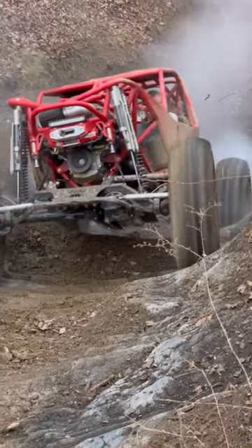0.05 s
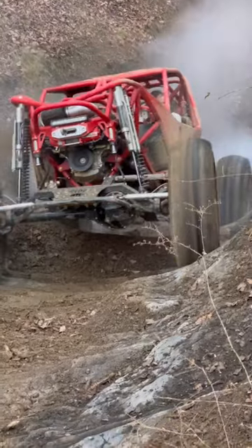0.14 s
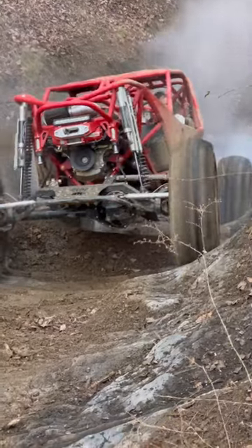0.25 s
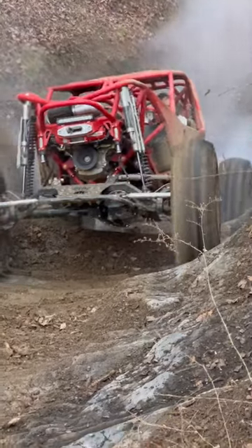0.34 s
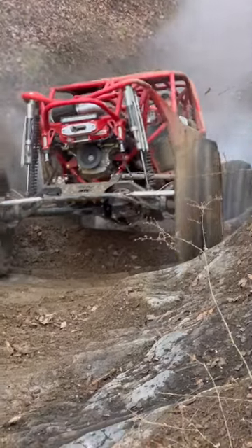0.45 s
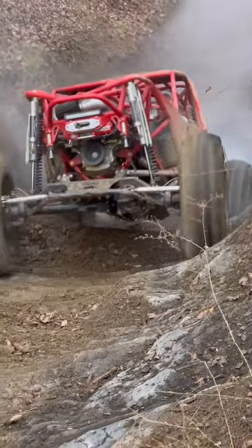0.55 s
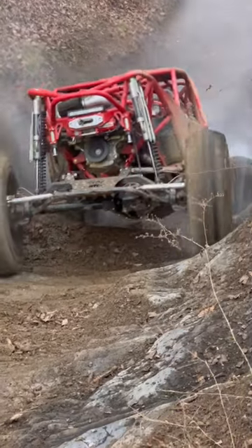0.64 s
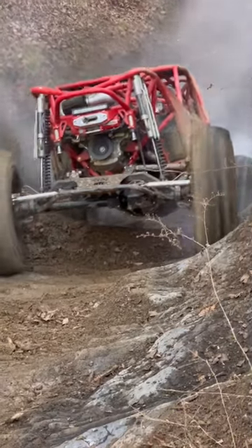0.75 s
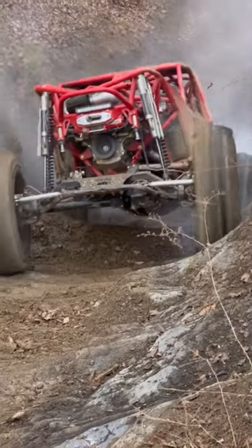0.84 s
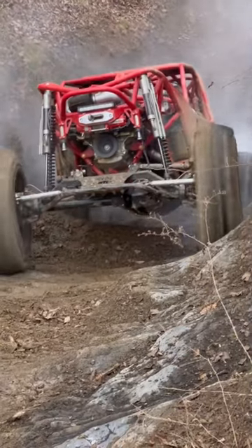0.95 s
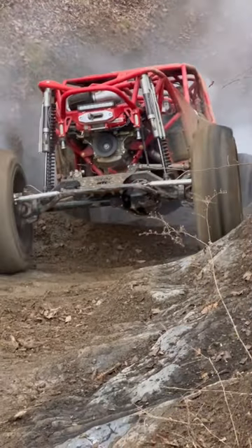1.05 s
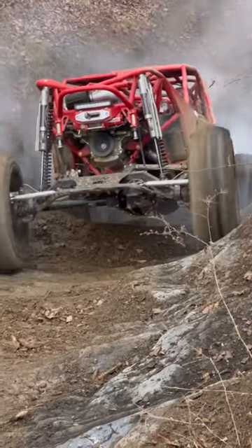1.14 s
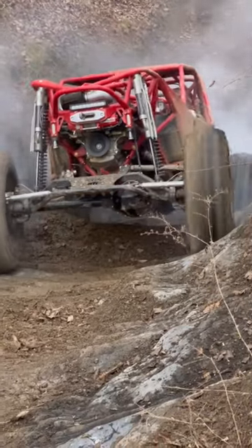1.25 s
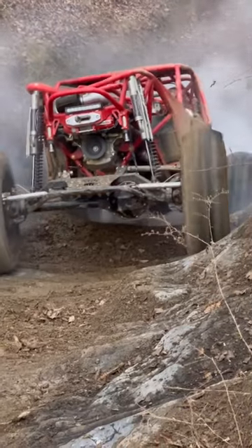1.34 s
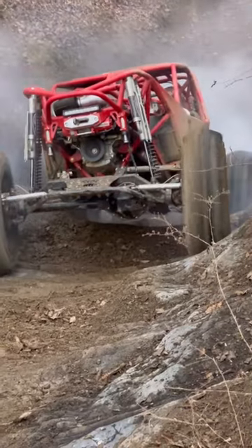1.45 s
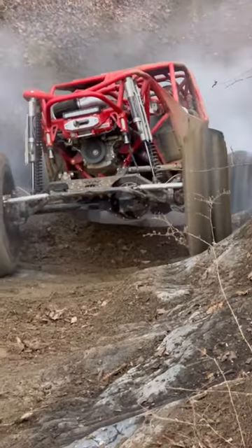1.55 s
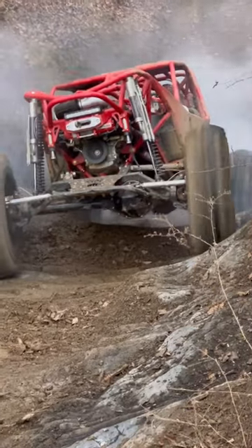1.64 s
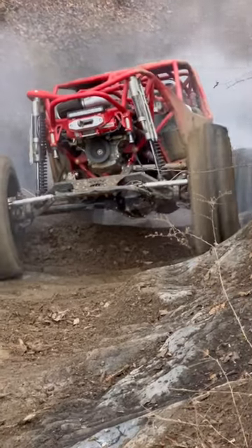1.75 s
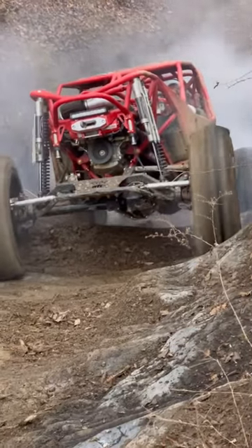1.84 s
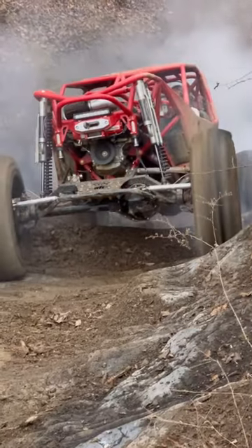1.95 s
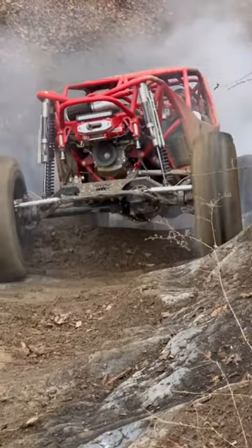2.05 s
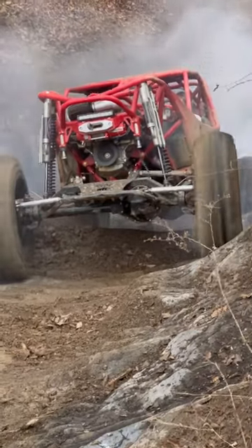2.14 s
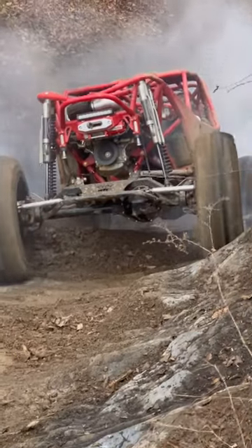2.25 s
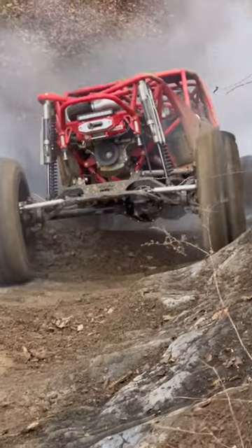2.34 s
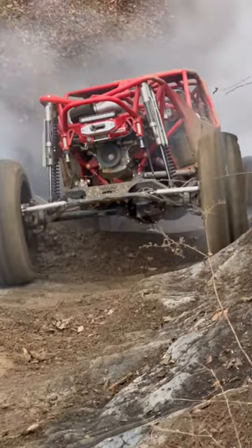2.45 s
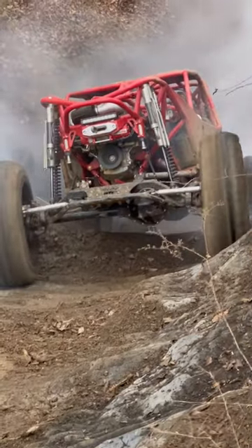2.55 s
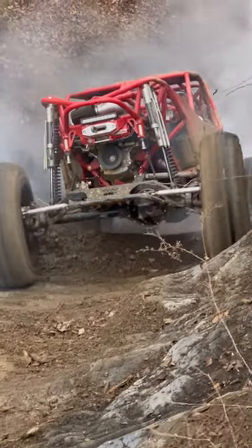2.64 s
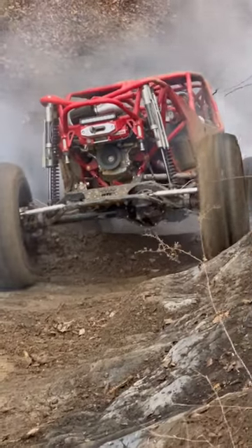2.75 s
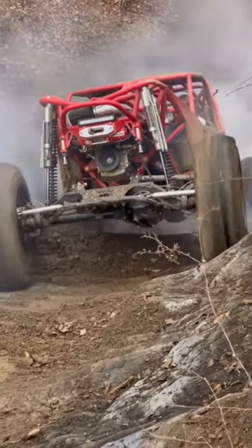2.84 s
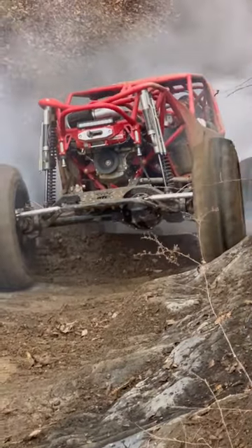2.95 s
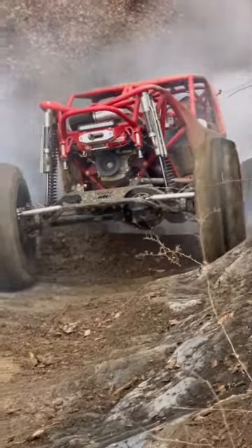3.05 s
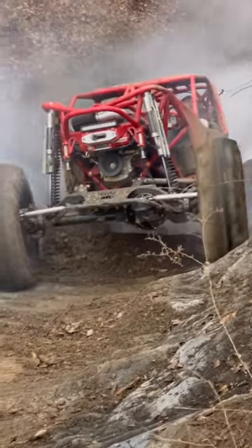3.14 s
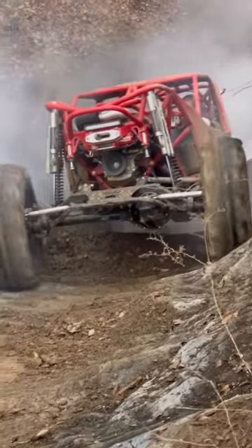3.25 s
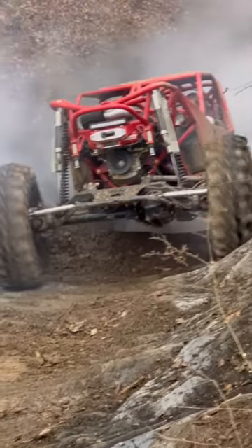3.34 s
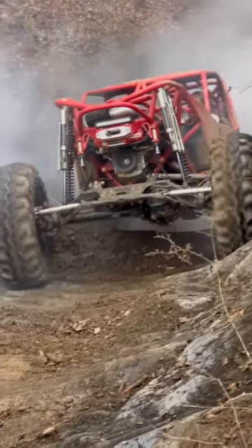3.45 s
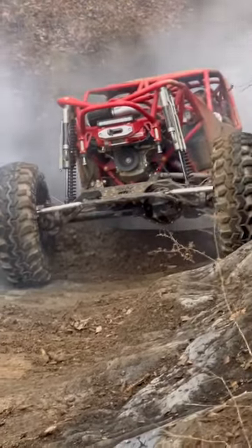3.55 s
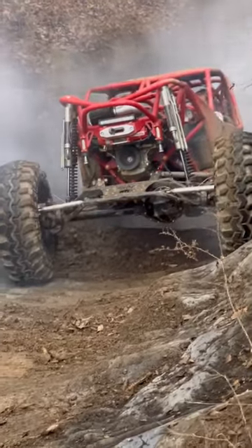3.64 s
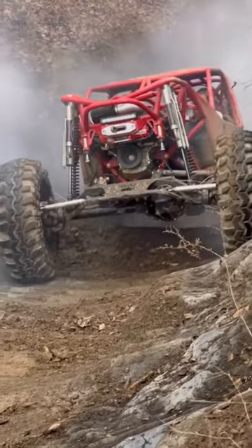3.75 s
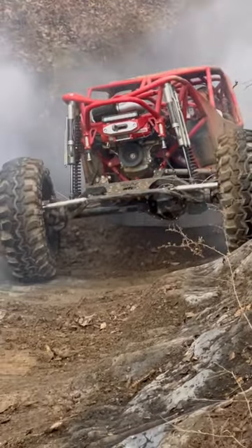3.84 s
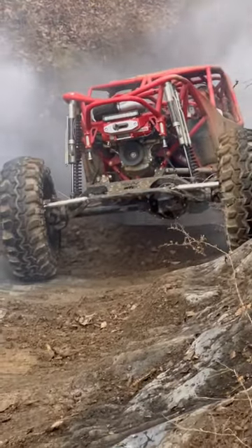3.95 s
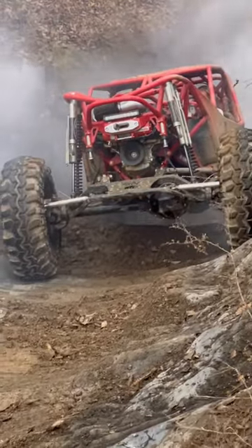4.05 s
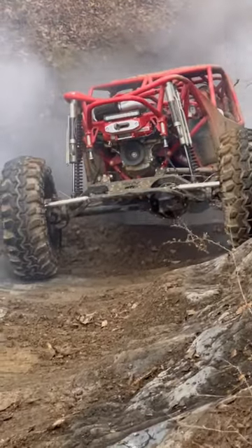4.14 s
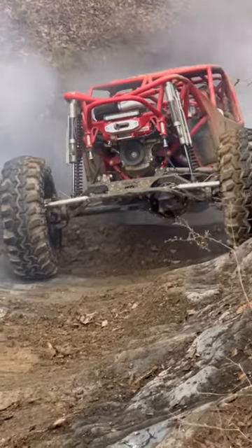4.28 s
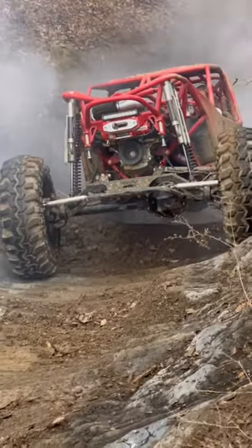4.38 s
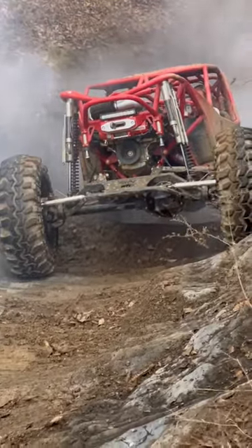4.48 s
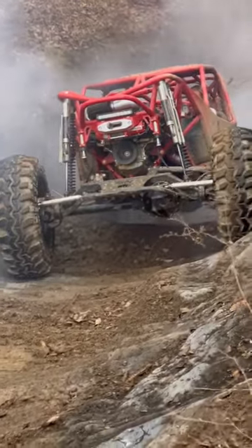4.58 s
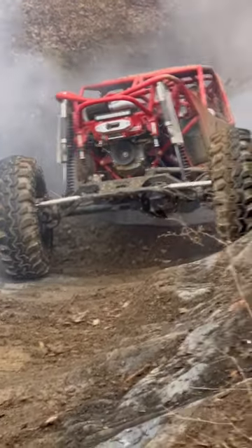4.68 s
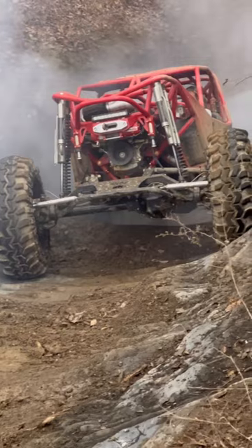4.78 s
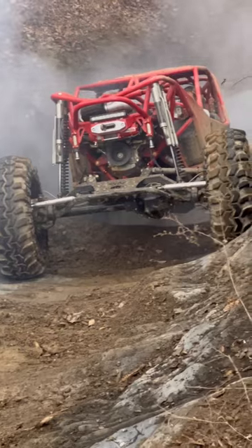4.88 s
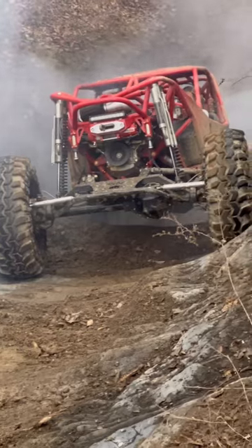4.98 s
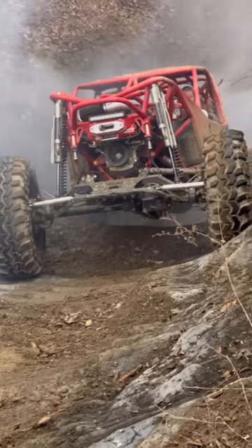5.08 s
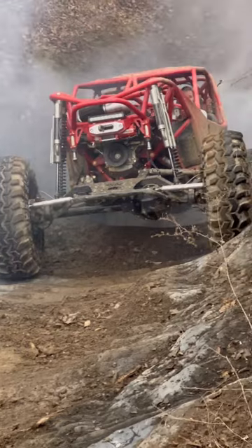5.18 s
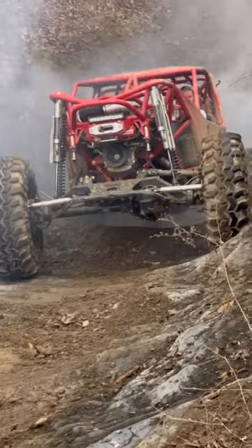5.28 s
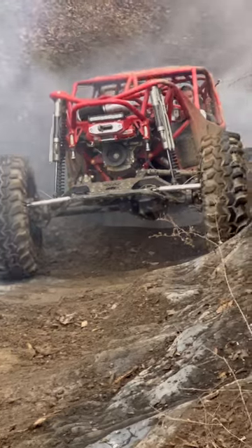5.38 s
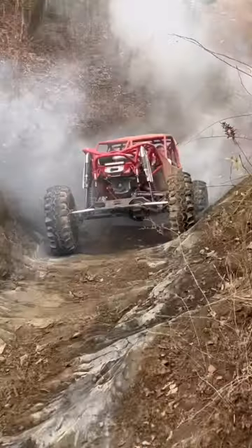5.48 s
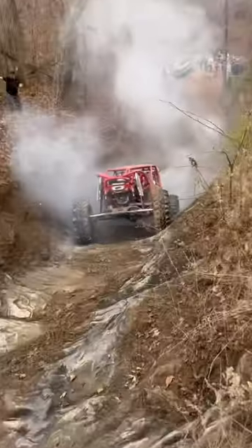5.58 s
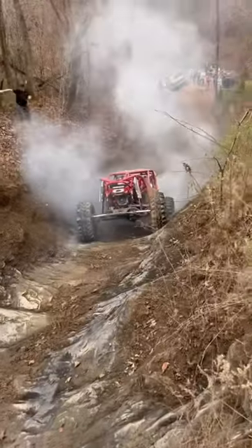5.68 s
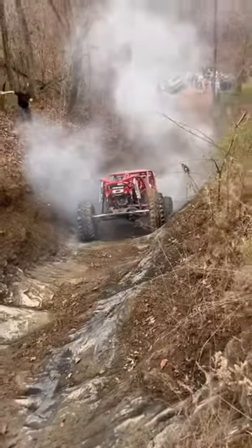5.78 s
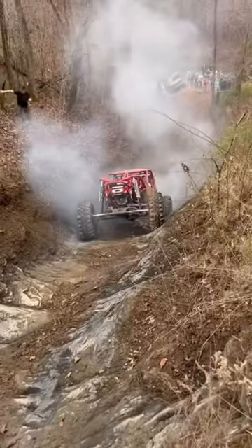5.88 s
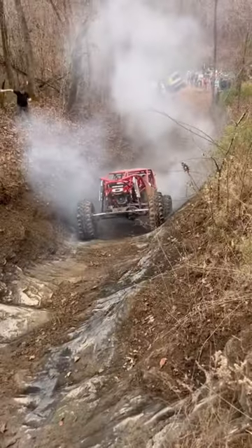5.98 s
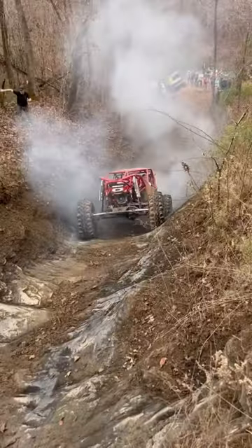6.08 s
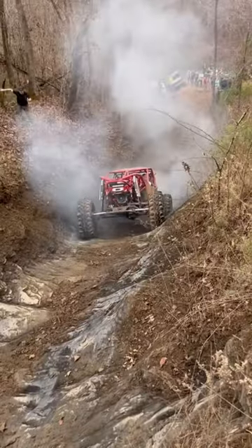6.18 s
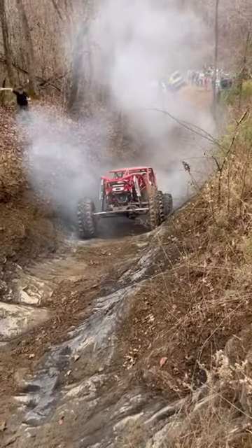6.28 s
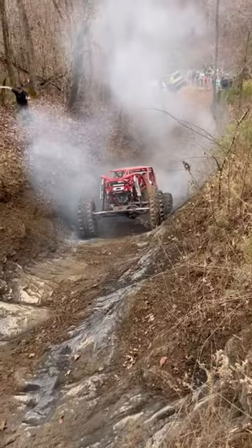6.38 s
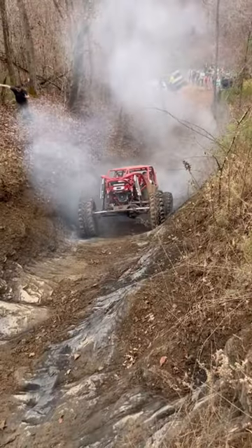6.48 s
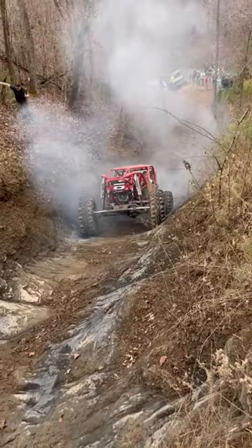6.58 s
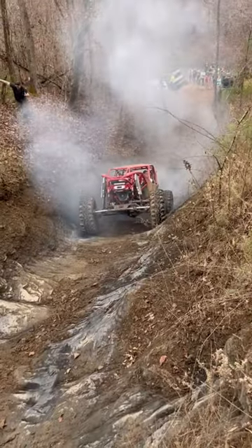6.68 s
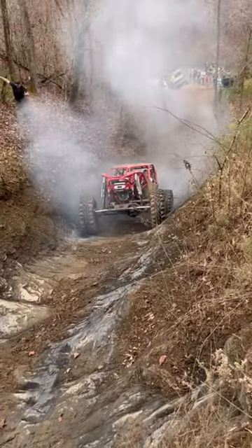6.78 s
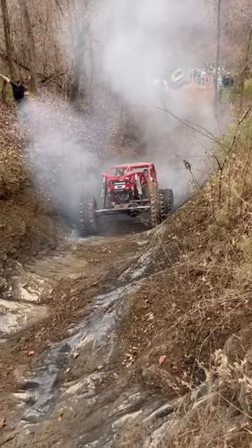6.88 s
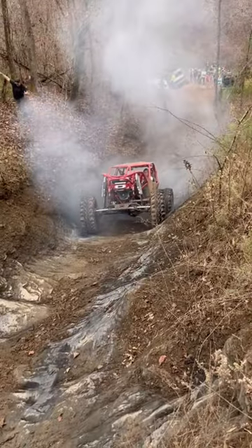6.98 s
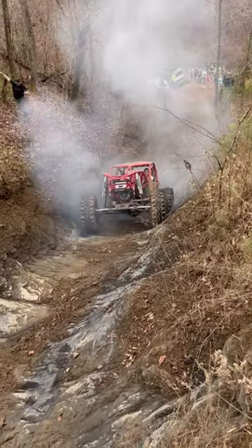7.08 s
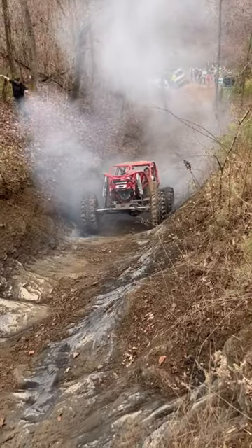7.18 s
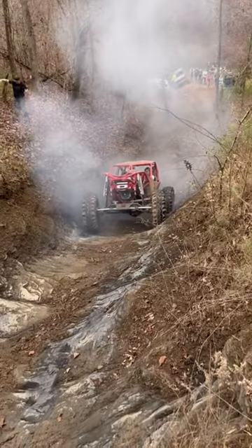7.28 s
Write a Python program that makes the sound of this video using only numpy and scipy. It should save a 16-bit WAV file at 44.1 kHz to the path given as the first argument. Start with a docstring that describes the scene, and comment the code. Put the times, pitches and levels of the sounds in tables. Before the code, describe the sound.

An open-piped V8 off-road buggy roars in three hard throttle surges, each breaking into burble, then winds down to a lumpy, stumbling idle.

```python
"""A V8 roars through open pipes: a rock buggy spins its tyres on a ledge in a wooded gully.
The tail of one throttle stab and three full surges each end in a burble; then the revs run down,
the tyre hiss fades, and a lumpy idle stumbles, catches and settles with one weak cylinder.
Driving exhaust is summed engine orders plus noise; idle is a pumping sine, rung pulses and clatter.
Filtered noise makes tyres, stones and knock, a sine makes a faint peep; sparse echoes add the gully."""
import sys
import numpy as np
from scipy import signal
from scipy.fft import rfft, irfft, next_fast_len
from scipy.io import wavfile
from scipy.ndimage import uniform_filter1d

SR = 44100
rng = np.random.default_rng(int(sys.argv[2]) if len(sys.argv) > 2 else 0)


def wrap_up_sound(samples):
    """Save the sound to the file named by the first command line argument, as 16-bit audio."""
    columns = np.atleast_2d(samples).T
    # keep every value between -1 and 1, then stretch to whole-number steps
    tamed = np.clip(columns, -1, 1)
    steps = np.round(tamed * 32767).astype(np.int16)
    wavfile.write(sys.argv[1], SR, steps)


N = 322812
T = np.arange(N) / SR  # time in seconds
FIRINGS_PER_CYCLE = 8  # engine speed is in four-stroke cycles per second


def amp(db):
    """Decibels to gain."""
    return 10 ** (np.asarray(db) / 20)


def unit(x):
    """Scales to rms 1."""
    return x / np.sqrt(np.mean(x ** 2) + 1e-20)


def read(points, hz):
    """Reads a spectrum's level between its points, on a log-frequency axis."""
    f, value = np.transpose(points)
    return np.interp(np.log(hz + 1), np.log(f + 1), value)


def ramp(s, length):
    """A smooth step from 0 to 1 centred on time s."""
    return .5 + .5 * np.tanh(2 * (T - s) / length)


def bump(s, length):
    """A smooth hump of height 1 centred on time s."""
    return np.exp(-((T - s) / length) ** 2)


def glide(start, end, bend):
    """Goes from 0 to 1 between two times; a bend above 1 makes it fastest at first."""
    return 1 - (1 - np.clip((T - start) / (end - start), 0, 1)) ** bend


def wander(rate_hz):
    """A smooth random drift of rms 1, with rate_hz random points a second."""
    knots = rng.standard_normal(8192)
    drift = np.interp(T * rate_hz, np.arange(len(knots)), knots)
    return unit(uniform_filter1d(drift, 64))


def colour(x, points):
    """Shapes x with a causal minimum-phase filter of the given spectrum, then scales to rms 1."""
    level_db = np.maximum(read(points, abs(np.fft.fftfreq(8192, 1 / SR))), -100)
    response = np.exp(np.conj(signal.hilbert(np.log(amp(level_db)))))
    taps = np.fft.ifft(response).real[:4096]
    return unit(signal.oaconvolve(x, taps)[:N])


def air_noise(points, flutter):
    """White noise swelling with the flutter, then coloured to rms 1."""
    return colour(flutter * rng.standard_normal(N), points)


def firings(crank):
    """Sample index and cylinder number of every firing."""
    number = np.floor(crank * FIRINGS_PER_CYCLE).astype(int)
    at = np.flatnonzero(np.diff(number)) + 1
    return at, number[at] % FIRINGS_PER_CYCLE


def pulses(at, sizes):
    """A train of single clicks."""
    train = np.zeros(N)
    train[at] = sizes
    return train


def gully(x, t60=0.16):
    """Sparse random echoes from rock banks and trees, dying by 60 dB in t60 seconds."""
    t = T[:SR // 2]
    scattered = rng.standard_normal(len(t)) * (rng.random(len(t)) < .04)
    taps = scattered * (t > .004) * amp(-60 * t / t60)
    return signal.oaconvolve(x, taps / np.linalg.norm(taps))[:N]


# sound that differs between the ears: f/Hz, level/dB against the common sound
WIDTH = [(100, -109), (380, -29.5), (700, -14.5), (1300, -15), (2400, -78), (4400, -22.5), (8100, 1.5),
         (15000, -3)]


def near_reflections(x):
    """Very short echoes that differ between the ears, mostly in the treble."""
    size = next_fast_len(N + SR)
    gain = amp(read(WIDTH, np.fft.rfftfreq(size, 1 / SR)))
    return irfft(rfft(gully(x, t60=0.009), size) * gain, size)[:N]


def peep(s=5.37, hz=7450, db=-69, length=0.023):
    """One thin, faint peep, like a small bird's: a sine of slightly wavering pitch."""
    tone = np.sin(2 * np.pi * np.cumsum(hz + 70 * wander(200)) / SR)
    return amp(db) * bump(s, length) * tone


# small stones knocking: t/s, level/dB before a 16 dB trim, ring f/Hz
STONES = [(4.142, -57, 5000), (5.175, -68, 5500), (5.445, -57, 2000)]


def stones():
    """Loose stones knock briefly: band-shaped noise that dies by 60 dB in 0.14 s."""
    out = np.zeros(N)
    for s, db, hz in STONES:
        age = np.maximum(T - s, 0)
        knock = colour(rng.standard_normal(N), [(hz / 4, -20), (hz, 0), (hz * 3, -22)])
        out += amp(db - 16 - 60 * age / 0.14) * (T > s) * knock
    return out


STEAM_END_S = 4.05  # the hot tyres hiss on for a moment after they stop; the fade centres here
# colour of the tyre hiss: f/Hz, level/dB relative
TYRE_HISS = [(500, -7), (1200, -9), (2300, -4), (3700, -10.5), (4900, -3), (5900, -8), (10400, -13),
             (11900, -11), (15600, -24.5)]


def tyres(tyre_db):
    """Gritty hiss of rubber spinning and steaming on wet rock: noise with a fine random flutter."""
    grit = amp(0.48 * wander(900) + 0.12 * wander(40))
    return amp(tyre_db) * (1 - ramp(STEAM_END_S, 0.25)) * air_noise(TYRE_HISS, grit)


KNOCK_DB = -67.5
KNOCK_TURN, KNOCK_FADE_TURNS = 0.62, 0.19  # place after the weak firing and decay, in cycles
# colour of the idle knock: f/Hz, level/dB relative
KNOCK = [(120, -40), (350, -21), (600, 6.5), (800, -8), (1400, -23), (2600, -33), (5000, -89)]


def knocking(crank):
    """A dull knock once a cycle: noise that starts at KNOCK_TURN and decays with crank angle."""
    decay = np.exp(-((crank - KNOCK_TURN) % 1) / KNOCK_FADE_TURNS)
    return amp(KNOCK_DB) * air_noise(KNOCK, decay)


CLATTER_DB, CLATTER_SAG_DB = -45.5, 5.5  # steady level, and how far below it the sound starts
# colour of the mechanical clatter: f/Hz, level/dB relative
CLATTER = [(30, -25), (55, 14), (170, 13), (260, 7.5), (340, -2.5), (480, -10), (595, -6.5), (670, -0.5),
           (750, -7), (1000, -12.5), (1550, -20.5), (2300, -19.5), (3400, -26.5), (10400, -37),
           (11700, -33), (15600, -42)]


def clatter(crank, sag):
    """Mechanical noise that swells at the firing rate and flutters at random."""
    firing_phase = 2 * np.pi * FIRINGS_PER_CYCLE * crank
    ticks = amp(0.55 * np.cos(firing_phase - 1.2) + 0.78 * wander(130))
    return amp(CLATTER_DB - CLATTER_SAG_DB * sag) * air_noise(CLATTER, ticks)


RING_DB, RING_SAG_DB, STUMBLE_DB = -34, 5.5, 3.5  # steady level, sag at the start, loss while stumbling
# pipe colour at idle: f/Hz, level/dB relative
IDLE_PIPE = [(30, -51), (55, -38), (100, 3.5), (130, -2), (158, 7.5), (185, 1), (215, -24.5), (280, -38),
             (350, -28), (470, -46.5), (600, -23.5), (680, -54), (750, -30), (950, -61), (1800, -100)]


def pipe_ring(crank, sag, stumbling):
    """Each firing rings the exhaust pipe, with its own strength and delay."""
    at, cylinder = firings(crank)
    chance = rng.standard_normal((len(at), 2))
    # one cylinder barely fires, the next is still short of breath; all stumble until the idle catches
    scatter = 0.18 + 0.75 * stumbling[at]
    strength = (1 - .95 * (cylinder == 0) - .4 * (cylinder == 1)) * (1 + scatter * chance[:, 0])
    delay = (.0018 * SR * scatter * chance[:, 1]).astype(int)
    late = np.clip(at + delay, 0, N - 1)
    ring = colour(pulses(late, strength / np.hypot(1, scatter)), IDLE_PIPE)
    ring /= np.sqrt(uniform_filter1d(ring ** 2, size=SR // 3) + 1e-9)  # evens out the slow level
    return amp(RING_DB - RING_SAG_DB * sag - STUMBLE_DB * stumbling) * ring


PUMP_DB, PUMP_SAG_DB = -30.5, 17  # steady level, and how far below it the sound starts
PUMP_DIP, PUMP_DIP_TURNS = 0.14, 0.12  # share lost after the weak firing; delay and width in cycles


def pumping(crank, sag):
    """A soft sine at the firing rate that dips once a cycle for the weak cylinder."""
    firing_phase = 2 * np.pi * FIRINGS_PER_CYCLE * crank
    pump = np.sqrt(2) * np.sin(firing_phase) * (1 + .1 * wander(30))
    since_weak = (crank + .5) % 1 - .5
    pump *= 1 - PUMP_DIP * np.exp(-(since_weak / PUMP_DIP_TURNS - 1) ** 2)
    return amp(PUMP_DB - PUMP_SAG_DB * sag) * pump


# the idle takes over from the run-down, stumbles, catches, and slowly grows louder
SETTLE_S, SETTLE_LENGTH_S, CATCH_S, RISE_S = 3.42, 0.56, 4.03, 1.28


def idling(crank):
    """Pumping, pipe ring, clatter and knock, all locked to one crank."""
    sag = np.exp(-np.maximum(T - SETTLE_S, 0) / RISE_S)
    stumbling = 1 - ramp(CATCH_S, 0.08)
    return pumping(crank, sag) + pipe_ring(crank, sag, stumbling) + clatter(crank, sag) + knocking(crank)


BOG_S, COAST_BEND = 0.045, 1.2  # the engine bogs before it climbs; after a lift it slows fastest at first
IDLE_HZ, IDLE_FROM_S = 8.75, 4.6  # the speed it comes to rest at
HUNT_S, HUNT_LENGTH_S, HUNT_HZ = 4.64, 0.2, 1.6  # the idle rises once and settles back
# throttle stabs, also read by the functions below: pressed t/s, lifted t/s, speed at press f/Hz,
# speed at lift f/Hz, bend of the climb (1 = straight), swell t/s, boom level/dB under load,
# bark level/dB added by full pipe pressure, tyre hiss level/dB at TOP_HZ
STABS = [(-0.4, 0.018, 46.2, 55.13, 1.7, 0.033, -18.5, 7.9, -43),
         (0.306, 0.838, 45.4, 55.6, 1.8, 0.01, -19, 8.2, -46),
         (1.135, 1.668, 43.61, 55.73, 1.4, 0.057, -18, 8.8, -43),
         (1.955, 2.585, 45.82, 55.88, 1.55, 0.024, -20, 7, -47.5)]
# the long run-down after the last stab: t/s, engine speed f/Hz
RUN_DOWN = [(2.65, 51.4), (2.82, 43.6), (3.1, 34.54), (3.4, 20.61), (3.6, 14.63), (3.8, 11.61), (4.12, 9.2)]


def engine_speed():
    """Revs climb during each stab and sink until the next; then they run down to an idle that hunts once."""
    pressed, lifted, low_hz, high_hz, bend, *_ = np.transpose(STABS)
    climbs = sum(glide(press + BOG_S, lift, curve) * rise
                 for press, lift, curve, rise in zip(pressed, lifted, bend, high_hz - low_hz))
    coasts = sum(glide(lift, press, COAST_BEND) * fall
                 for lift, press, fall in zip(lifted, pressed[1:], high_hz[:-1] - low_hz[1:]))
    path = [(lifted[-1], high_hz[-1]), *RUN_DOWN, (IDLE_FROM_S, IDLE_HZ)]
    run_down = np.interp(T, *np.transpose(path))
    speed = np.where(T < lifted[-1], low_hz[0] + climbs - coasts, run_down)
    return speed + HUNT_HZ * bump(HUNT_S, HUNT_LENGTH_S)


def surge(build_s, fall_s):
    """0 to 1: builds during each stab, build_s slower than its own swell, and dies away after the lift."""
    swells = []
    for press, lift, _, _, _, swell, *_ in STABS:
        build = 1 - np.exp(-np.maximum(T - press, 0) / (swell + build_s))
        swells.append(build * np.exp(-np.maximum(T - lift, 0) / fall_s))
    return np.max(swells, axis=0)


TOP_HZ = 55  # coasting levels hold here and drop with every halving of the engine speed
COAST_BOOM_DB, BOOM_DB_PER_OCTAVE = -25, 7
COAST_BARK_DB, BARK_DB_PER_OCTAVE, BARK_THROTTLE_DB = -33.5, 12.5, 4
TYRE_DB_PER_OCTAVE = 13
PRESSURE_BUILD_S, PRESSURE_FALL_S = 0.02, 0.16
SCUFF_S, SCUFF_LENGTH_S, SCUFF_DB = 1.086, 0.04, 4.5  # a tyre scrapes harder over the rock for a moment


def drive_levels(speed, throttle):
    """Levels in dB of boom, bark and tyres, from the engine's speed and load."""
    pressed, *_, stab_boom_db, stab_bark_db, stab_tyre_db = np.transpose(STABS)
    stab = np.searchsorted(pressed, T) - 1
    octaves = np.log2(speed / TOP_HZ)
    load = surge(0, fall_s=0.032)
    coast_boom_db = COAST_BOOM_DB + BOOM_DB_PER_OCTAVE * octaves
    boom_db = load * stab_boom_db[stab] + (1 - load) * coast_boom_db
    pressure = surge(PRESSURE_BUILD_S, PRESSURE_FALL_S)
    bark_db = COAST_BARK_DB + BARK_DB_PER_OCTAVE * octaves
    bark_db = bark_db + BARK_THROTTLE_DB * throttle + stab_bark_db[stab] * pressure
    tyre_db = stab_tyre_db[stab] + TYRE_DB_PER_OCTAVE * octaves + SCUFF_DB * bump(SCUFF_S, SCUFF_LENGTH_S)
    return boom_db, bark_db, tyre_db


# unevenly spaced firings in each bank: engine order, on-throttle level/dB, coasting level/dB, relative
ORDER_PATTERN = [(1, -5.5, 1), (2, -2, -12.5), (3, 2.5, 4), (4, -2, -1.5), (5, -0.5, 3), (6, -4.5, 1.5),
                 (7, -6.5, -2.5), (8, 3.5, 2), (9, -1, -9.5), (10, -1.5, -8.5), (11, 3.5, 0), (12, -4, -5),
                 (13, -2, -1.5), (14, -1, 2.5), (15, -2, -4), (16, -1.5, 1.5)]
# exhaust pipe colour, hot on throttle: f/Hz, level/dB relative
HOT_PIPE = [(45, -27.5), (105, -9), (148, -0.5), (178, -12.5), (228, 3.5), (280, 0.5), (345, -8.5),
            (410, -18), (440, -13.5), (500, -15), (570, -5.5), (660, -6.5), (770, -14.5), (1020, -17),
            (1450, -25), (2200, -26), (4000, -38.5)]
# exhaust pipe colour, cooler when coasting: f/Hz, level/dB relative
COOL_PIPE = [(40, -29), (55, -15), (100, -6), (145, -8), (188, 5), (220, -8), (275, 0), (340, -10.5),
             (420, -16.5), (500, -9.5), (620, -7.5), (800, -22.5), (1150, -28.5), (2500, -40.5)]


def exhaust_orders(speed, crank, throttle, count=72, jitter=0.002, dispersion=.113, soften_db=17, fade_db=5.5):
    """Engine orders glide through the pipe's resonances; gives the low boom and the upper bark."""
    hop = 64  # gains are worked out every 64 samples
    cycle_hz, load = speed[::hop], throttle[::hop]
    turn = np.exp(2j * np.pi * (crank + jitter * wander(110)))  # firing times jitter, which blurs high orders
    softness = soften_db * np.maximum(1 - cycle_hz / 47, 0)  # slow pulses are rounder: dB lost per octave
    waves, powers = np.zeros((2, N)), np.zeros((2, len(load)))
    spin = np.ones(N, complex)
    for k in range(1, count + 1):
        _, on_db, off_db = ORDER_PATTERN[(k - 1) % len(ORDER_PATTERN)]
        hz = k * cycle_hz
        throttle_db = on_db + read(HOT_PIPE, hz)
        coast_db = off_db + read(COOL_PIPE, hz) - softness * np.log2(np.clip(hz / 160, 1, 3))
        gain = amp(load * throttle_db + (1 - load) * coast_db)
        upper = 1 / (1 + (400 / hz) ** 8)  # boom and bark part at 400 Hz
        # each order drifts at random in level, more so at higher frequencies
        window = signal.get_window("hann", Nx=120)
        drift = unit(np.convolve(rng.standard_normal(len(hz)), window, "same"))
        fading = amp(fade_db * np.minimum(hz / 1000, 1) * drift)
        spin = spin * turn
        line = (spin * np.exp(2j * np.pi * dispersion * k ** 2)).real  # the pipe spreads each pulse in time
        for band, share in enumerate((1 - upper, upper)):
            powers[band] += (gain * share) ** 2 / 2
            waves[band] += line * np.interp(T, T[::hop], gain * share * fading)
    # each band is levelled by its expected power, so the driving levels set its loudness
    return [wave / np.sqrt(np.interp(T, T[::hop], power) + 1e-12) for wave, power in zip(waves, powers)]


# colour of the uneven pops: f/Hz, level/dB relative
BURBLE = [(25, -24), (52, -9.5), (100, -2.5), (157, -3.5), (271, -2.5), (405, -16), (600, -16), (800, -46),
          (1400, -100)]


def burbling(boom, speed, crank, throttle):
    """As the throttle shuts, unburnt fuel pops unevenly and breaks up the boom."""
    burble = sum(ramp(lift, 0.072) * (1 - ramp(lift + 0.11, 0.16)) for _, lift, *_ in STABS)
    at, _ = firings(crank)
    sizes = rng.standard_normal(N)[at] / np.sqrt(speed[at])
    uneven = colour(pulses(at, sizes), BURBLE)
    rough = np.clip(0.14 * throttle + 0.33 * (1 - throttle) + 0.84 * burble, 0, .97)
    return np.sqrt(1 - rough ** 2) * boom + rough * uneven


GAS_DB, GAS_BUILD_S, GAS_FALL_S = -37.5, 0.053, 0.042
# colour of the rasp: f/Hz, level/dB relative
RASP = [(250, -47.5), (450, -5), (620, -3), (1000, -5.5), (1260, -6), (1490, -10.5), (2300, -12),
        (4800, -22.5), (7000, -29.5), (12000, -40.5)]
# colour of the hissing gas: f/Hz, level/dB relative
GAS_HISS = [(1760, -26), (3000, -4), (4930, -6.5), (10300, -19.5), (11900, -15), (15600, -28)]


def driving(speed, crank, throttle, boom_db, bark_db):
    """Exhaust note, rasp torn from each pulse, hissing gas, and burble after each lift."""
    boom, bark = exhaust_orders(speed, crank, throttle)
    low = amp(boom_db) * burbling(boom, speed, crank, throttle)
    # turbulence swells with every pressure crest
    puffs = amp(1.5 * np.clip(boom, -2, 2) + 1.3 * np.clip(bark, -2, 2) + .5 * wander(70))
    note = amp(bark_db - 2.2 * throttle - 6.1 * (1 - throttle)) * bark
    rasp = amp(bark_db - 4.7 * throttle - 6.5 * (1 - throttle)) * air_noise(RASP, puffs)
    gas = amp(GAS_DB) * surge(GAS_BUILD_S, GAS_FALL_S) ** 2 * air_noise(GAS_HISS, puffs)
    return low + note + rasp + gas


WEAK_FIRING_S = 5.392  # a moment when the weak cylinder fires; sets the crank's zero


def scene():
    """One crankshaft drives the engine; the driving sound gives way to idle as the revs die."""
    speed = engine_speed()
    crank = np.cumsum(speed) / SR  # in cycles
    crank -= np.interp(WEAK_FIRING_S, T, crank)
    presses = sum(ramp(press, 0.02) * (1 - ramp(lift, 0.016)) for press, lift, *_ in STABS)
    throttle = np.clip(presses, 0, 1)
    boom_db, bark_db, tyre_db = drive_levels(speed, throttle)
    settled = ramp(SETTLE_S, SETTLE_LENGTH_S)
    engine = np.sqrt(1 - settled) * driving(speed, crank, throttle, boom_db, bark_db)
    engine += np.sqrt(settled) * idling(crank)
    direct = engine + tyres(tyre_db) + stones() + peep()
    mid = direct + amp(-18) * gully(direct)
    side = near_reflections(direct)
    return np.array([mid + side, mid - side])


EDGE_HZ = 15750  # upper band limit


def record(dry):
    """The microphone's bass roll-off, a soft stop, and the band limit."""
    bass_cut = signal.butter(4, 42, "highpass", fs=SR, output="sos")
    thinned = signal.sosfilt(bass_cut, dry)
    thinned = thinned * np.minimum((T[-1] - T) / .008, 1)  # 8 ms fade at the end
    band_limit = signal.firwin(511, EDGE_HZ, window=("kaiser", 9), fs=SR)
    return signal.oaconvolve(thinned, band_limit[None], "same")


dry = scene()
out = record(dry)
wrap_up_sound(out)
```